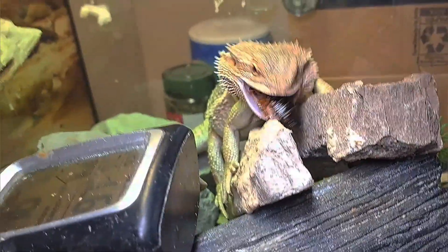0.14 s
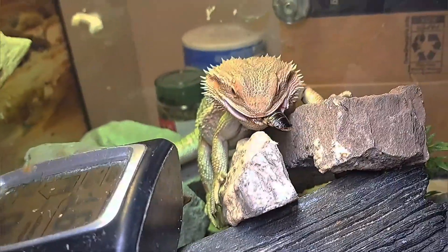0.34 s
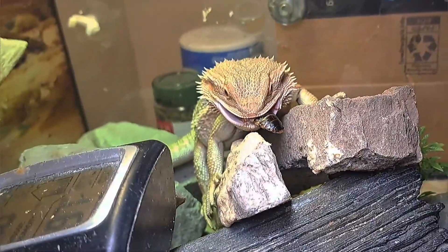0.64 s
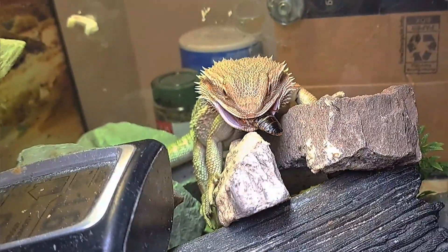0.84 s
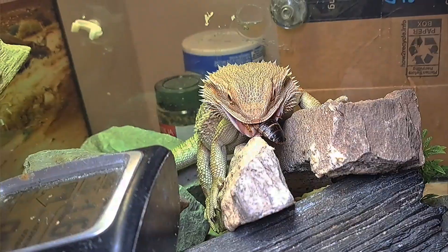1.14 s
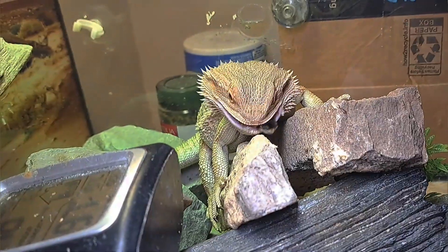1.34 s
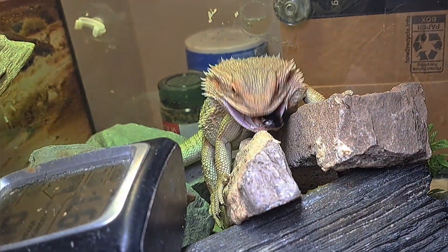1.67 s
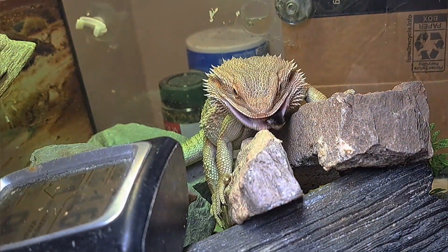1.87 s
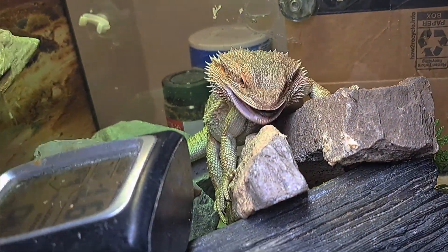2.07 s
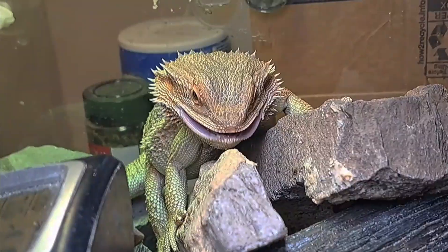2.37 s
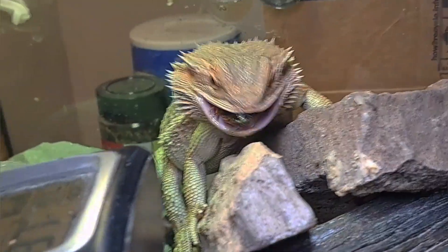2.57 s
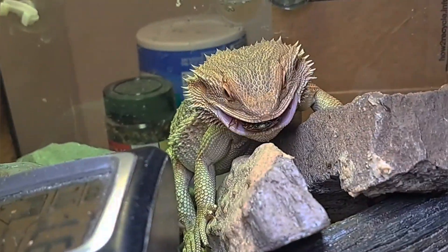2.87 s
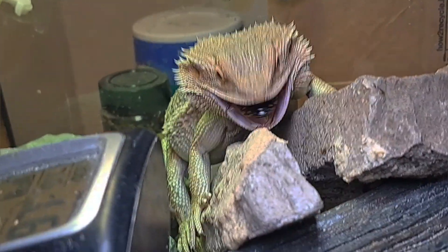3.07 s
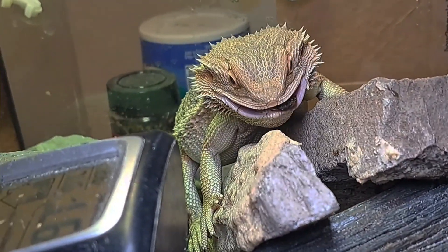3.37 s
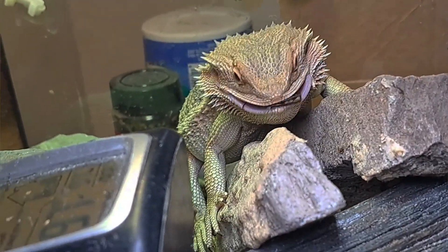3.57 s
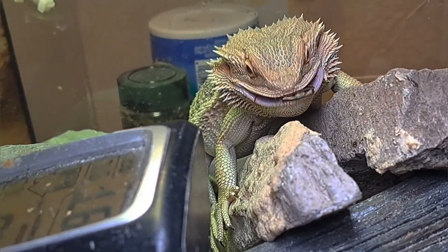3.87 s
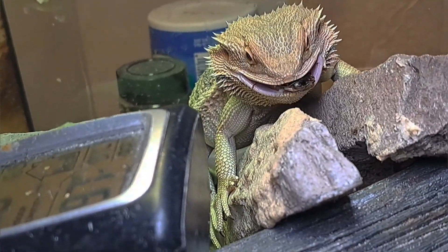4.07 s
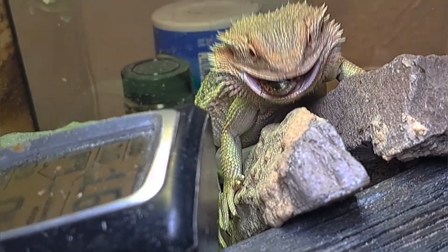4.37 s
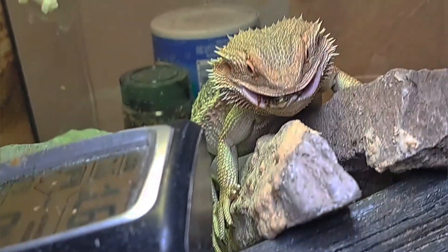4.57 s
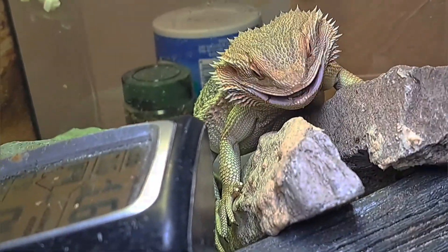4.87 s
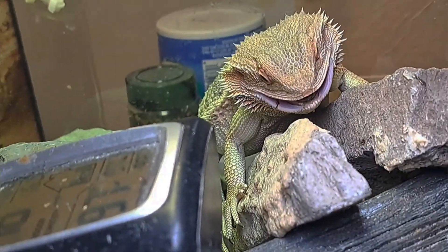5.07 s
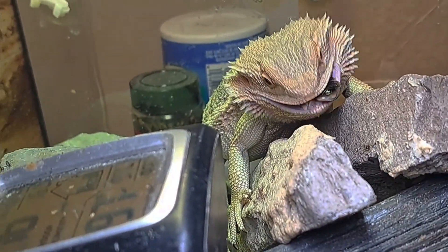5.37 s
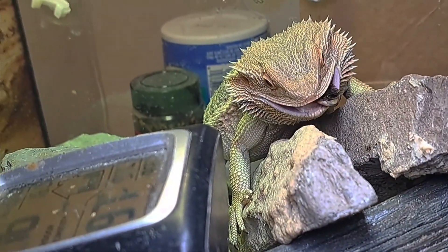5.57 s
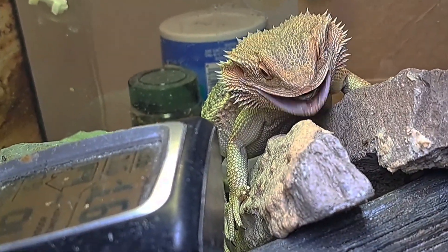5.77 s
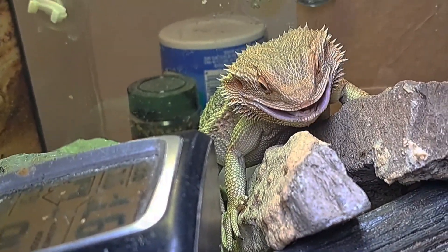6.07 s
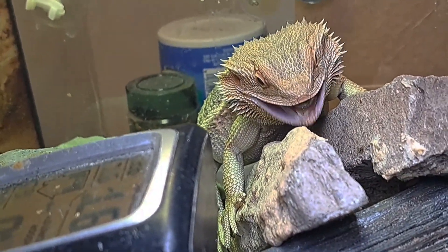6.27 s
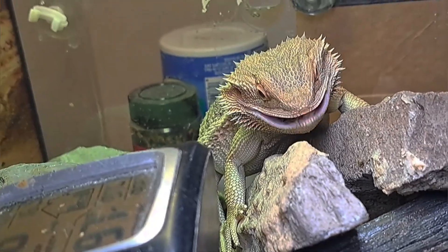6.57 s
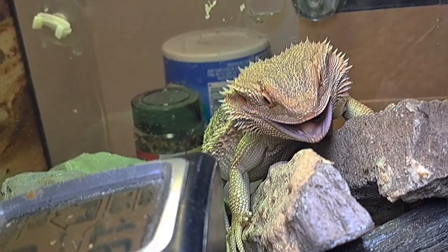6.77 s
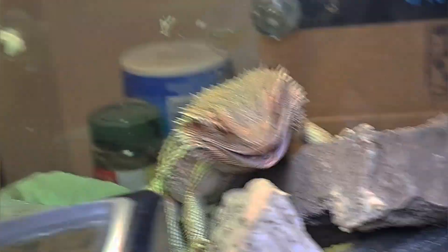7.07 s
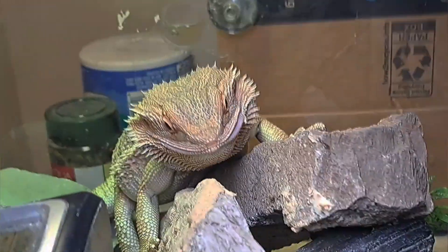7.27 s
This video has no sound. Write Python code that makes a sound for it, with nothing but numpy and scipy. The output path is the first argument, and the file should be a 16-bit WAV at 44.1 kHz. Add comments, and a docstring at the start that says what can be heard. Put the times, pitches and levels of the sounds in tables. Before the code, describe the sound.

A bearded dragon crunches a hard-shelled insect close by, with crisp snaps, crackles and dull bite knocks over a low wavering motor hum.

```python
"""A lizard's crunching meal

A bearded dragon chews a cockroach in a glass tank, close by. Sharp cracks amid random grains make the
shell snap and crackle; damped modes make heavy bites knock dully; gliding tones squeak in the wet mouth.
Decaying random echoes give the tank its short bright ring. A small motor hums nearby at a wandering
speed, as sines over filtered noise, with faint room air and a thin fan whine."""
import sys
import numpy as np
from scipy import signal
from scipy.fft import rfft, irfft
from scipy.io import wavfile
from scipy.ndimage import uniform_filter1d

SR = 44100
rng = np.random.default_rng(int(sys.argv[2]) if len(sys.argv) > 2 else 0)


def generate_wav(signal):
    """Clip the signal to [-1, 1] and save it as 16-bit WAV at the path in sys.argv[1]."""
    frames = np.transpose(np.atleast_2d(signal))
    scaled = np.clip(frames, -1, 1) * 32767
    pcm = np.round(scaled).astype(np.int16)
    wavfile.write(sys.argv[1], SR, pcm)


N = 326781
T = np.arange(N) / SR


def undb(db):
    """Logarithmic level: decibels to amplitude gain."""
    return 10 ** (np.asarray(db) / 20)


def unit(x):
    """Power normalisation: scale to rms 1."""
    return x / np.sqrt(np.mean(x ** 2))


def burst(x, db):
    """Energy normalisation: scale a short sound to the energy of 5 ms at this rms level."""
    return x * undb(db) * np.sqrt(.005 * SR / np.sum(x ** 2))


def curves(rows):
    """Linear interpolation: every column of a table, joined by straight lines in time."""
    s, *columns = np.transpose(rows)
    return [np.interp(T, s, column) for column in columns]


def add(out, s, x, pan_db=0):
    """Superposition: mix a sound into both channels at time s; pan_db is left minus right."""
    i = max(int(s * SR), 0)
    x = x[..., :N - i]
    out[:, i:i + x.shape[-1]] += x * undb(np.array([[pan_db], [-pan_db]]) / 2)


def colour(x, points, size=1024):
    """Minimum-phase filtering: a causal response of given (hz, db) magnitude, by folding the cepstrum."""
    hz, db = np.transpose(points)
    f = np.maximum(np.arange(size // 2 + 1) * SR / size, 1)
    magnitude = undb(np.interp(np.log(f), np.log(hz), db))
    cepstrum = irfft(np.log(magnitude))
    cepstrum[1:size // 2] *= 2
    cepstrum[size // 2 + 1:] = 0
    impulse_response = irfft(np.exp(rfft(cepstrum)))
    return signal.fftconvolve(x, impulse_response)[:len(x)]


def resonance(x, hz, q):
    """Second-order resonance: one band-pass peak."""
    b, a = signal.iirpeak(min(hz, SR / 2.5), max(q, 1), SR)
    return signal.lfilter(b, a, x)


def walk(rate):
    """Slow random modulation: held random values, smoothed, with a spread near 1."""
    k = int(SR / rate)
    held = np.repeat(rng.standard_normal(N // k + 1), k)[:N]
    return uniform_filter1d(held, k)


def grains(size, rate, spread_db):
    """Random point process: sparse impulses, their gain spread_db times a capped exponential draw."""
    keep, strength, sign = rng.random(size), rng.exponential(size=size), rng.standard_normal(size)
    gain = undb(spread_db * np.minimum(strength, 4))
    return (keep < rate / SR) * gain * np.sign(sign)


def tank(x, short_db=0, long_db=-5, short_t60=0.11, long_t60=0.23, lag_s=.00036):
    """Reverberation: glass and stone return two decaying sprays; direct sound lags to the left by up to lag_s."""
    t, out = T[:8192], []
    treble = signal.butter(2, 600, "high", fs=SR, output="sos")
    for lag in (int(lag_s * SR * rng.uniform(.5, 1)), 0):
        short = grains(len(t), rate=7600, spread_db=3.5) * undb(-60 * t / short_t60)
        long = grains(len(t), rate=8900, spread_db=1.0) * undb(-60 * t / long_t60)
        echoes = undb(short_db) * short / np.linalg.norm(short) + undb(long_db) * long / np.linalg.norm(long)
        echoes = signal.sosfilt(treble, echoes * (t > .0004))
        echoes[lag] = 1  # direct sound
        out.append(signal.fftconvolve(x, echoes))
    return np.array(out)


def motor():
    """Periodic rotation: a hum, its octave and weak half-order shaft lines, with casing noise and low rumble."""
    # motor speed: start_s, pitch_hz
    hum_pitch = [(0, 111.3), (0.5, 114), (0.9, 116.5), (1.3, 117.7), (1.42, 114.9), (1.55, 105.3),
                 (1.68, 97.6), (3.15, 97.1), (3.5, 99.6), (3.9, 99.9), (4.4, 102.4), (5.3, 105),
                 (6.2, 107.8), (6.9, 107.9), (7.4, 104.7)]
    # motor loudness: start_s, level_db
    hum_loudness = [(0, -36), (0.47, -28.5), (0.84, -31.5), (1.41, -28), (1.5, -39.5), (1.63, -28.5),
                    (1.74, -40), (2.25, -29), (2.7, -25), (3.62, -28.5), (4.12, -36), (4.38, -25),
                    (4.62, -33.5), (5.45, -42), (5.68, -58), (6.15, -41), (7.15, -40), (7.41, -49.5)]
    # the hum's octave and the rumble: start_s, octave_db, rumble_db
    octave_rumble = [(0, -65.5, -40.5), (1.3, -54.5, -41), (2.1, -59.5, -38.5), (2.7, -53, -37.5),
                     (3.6, -52, -41), (4.5, -55.5, -41), (5.15, -53, -44.5), (5.7, -63.5, -47),
                     (7.1, -57, -44)]
    # spectrum of the low rumble: pitch_hz, level_db
    rumble_colour = [(20, -16), (35, -11.5), (55, 6), (75, 2.5), (110, 1), (165, -6.5), (230, -20.5),
                     (300, -28), (500, -46), (2000, -71)]
    # spectrum of the casing's murmur: pitch_hz, level_db
    casing_colour = [(100, -8.5), (250, -0.5), (320, -4), (410, 2), (500, -12.5), (800, -19.5),
                     (1200, -35.5), (4000, -41.5)]
    (hz,), (hum_db,) = curves(hum_pitch), curves(hum_loudness)
    octave_db, rumble_db = curves(octave_rumble)
    phase = 2 * np.pi * np.cumsum(hz) / SR
    hum = undb(hum_db + 1.2 * walk(16)) * np.sin(phase)
    octave = undb(octave_db + 3.3 * walk(8)) * np.sin(2 * phase)
    shaft = undb(-26.5) * np.sin(phase / 2) + undb(-29.5) * np.sin(1.5 * phase)
    shaft = shaft * undb(hum_db + 3.0 * walk(5.5))
    mid, side = (unit(colour(rng.standard_normal(N), rumble_colour, size=8192)) for _ in range(2))
    casing = unit(colour(rng.standard_normal(N), casing_colour, size=4096))
    casing = undb(0.75 * hum_db - 41.5) * casing  # follows the hum's loudness
    centre = np.sqrt(2) * (hum + octave + shaft) + undb(rumble_db) * mid + casing
    width = undb(rumble_db - 12.0) * side * np.array([[1], [-1]])  # opposite sign in each channel
    return centre * undb(np.array([[.5], [-.5]])) + width


def air():
    """Broadband noise and a pure tone: faint room air with a slightly wavering fan whine that slowly fades."""
    # spectrum of the room air: pitch_hz, level_db
    air_colour = [(100, 9.5), (400, 8), (600, 1.5), (780, 7), (930, -1.5), (1400, -2.5), (3000, -6.5),
                  (6000, -13), (10000, -7), (12500, -4.5), (16000, -9)]
    left, right = (unit(colour(rng.standard_normal(N), air_colour, size=4096)) for _ in range(2))
    whine_phase = 2 * np.pi * np.cumsum(840 + 3 * walk(25)) / SR
    whine = undb(-72 - 2 * T + 2 * walk(20)) * np.sin(whine_phase)  # fades 2 dB per second
    return undb(-69 + .7 * walk(27)) * np.array([left, right]) + whine


def opening_ring():
    """Free damped oscillation: a low ring dies away exponentially from the start."""
    out = np.zeros((2, N))
    ring = undb(-32.0 - 60 * T / 0.46) * np.sin(2 * np.pi * 419 * T)
    add(out, 0, ring, pan_db=-6.0)
    return out


def wet_rubs():
    """Frictional noise: wet surfaces rub in the mouth as dense random grains that decay."""
    # rubs: start_s, level_db (before the decay), decay_s
    rub_table = [(0, -53.5, 0.039), (6.437, -67, 0.081), (6.52, -68.5, 0.036), (7.075, -57, 0.012),
                 (7.121, -67.5, 0.15)]
    # spectrum of the rubbing: pitch_hz, level_db
    rub_colour = [(300, -39), (650, 10), (1000, 9.5), (1500, 4.5), (2400, 2), (4000, -4), (6000, -3),
                  (9000, -3.5), (16000, -11)]
    out, t = np.zeros((2, N)), T[:12288]
    for s, db, decay in rub_table:
        rub = unit(colour(grains(len(t), rate=1800, spread_db=-7.5), rub_colour))
        add(out, s, tank(undb(db) * rub * np.exp(-t / decay)))
    return out


def crumble():
    """Fracture noise under load: jaw pressure scales grit and larger fragments; faint ticks go on between."""
    # jaw presses: start_s, swell_s, level_db
    chew_table = [(0.13, 0.11, -55), (0.35, 0.033, -56.5), (1.22, 0.079, -49), (1.37, 0.098, -58),
                  (1.758, 0.022, -58.5), (2.02, 0.088, -55), (2.25, 0.068, -52.5), (2.38, 0.21, -56),
                  (2.58, .2, -49.5), (2.84, 0.14, -57), (3.05, 0.16, -53.5), (3.24, 0.084, -52.5),
                  (3.47, 0.12, -55.5), (3.78, 0.12, -58.5), (4.33, 0.11, -51), (4.78, 0.049, -63),
                  (4.9, 0.11, -62.5), (5.33, 0.051, -63), (6.41, 0.08, -53.5), (7.07, 0.059, -65),
                  (7.18, 0.086, -61)]
    # spectrum of crumbling shell: pitch_hz, level_db
    crumble_colour = [(400, -19), (1500, -11), (3500, -14), (6000, -6.5), (8000, -1.5), (10000, -3.5),
                      (12500, 0), (15500, -0.5)]
    release_s, grit_db, fragment_db, tick_db = 0.064, -2, -6, -88
    pressure = np.zeros(N)
    for s, swell, db in chew_table:
        rise = np.clip((T - s) / swell, 0, 1)
        letting_go = np.exp(-np.maximum(T - s - swell, 0) / release_s)
        pressure += undb(db) * rise * letting_go
    pressure = pressure * undb(2.8 * walk(45))

    def debris(rate, spread_db):
        """Filtered point process: shell grains at rms 1."""
        return unit(colour(grains(N, rate, spread_db), crumble_colour))

    grit = np.array([debris(rate=5800, spread_db=-0.9) for _ in range(2)])
    fragments = undb(fragment_db) * pressure * debris(rate=55, spread_db=4.5)
    ticks = undb(tick_db) * debris(rate=4, spread_db=-3.0)
    echoed = tank(fragments + ticks, short_db=4.5, short_t60=0.085)[:, :N]
    return undb(grit_db) * pressure * grit + echoed


def snaps():
    """Impulse excitation: each snap is a sharp crack amid a brief spray of grains, coloured by a random resonance."""
    # loud shell snaps: start_s, hollow_body_db, plate_ring_db, bright_splinter_db, left_minus_right_db
    snap_table = [(0.157, -63, -54.5, -59, -1), (0.187, -69, -54, -51, 0), (0.21, -76, -57.5, -50, 1),
                  (0.255, -69.5, -52.5, -54, -5), (0.311, -75.5, -59, -58, -2), (0.36, -90, -75, -55, 1),
                  (0.443, -79.5, -57.5, -55, -7), (0.891, -80.5, -67.5, -66, -2),
                  (0.982, -84, -74.5, -65.5, 1), (1.105, -84.5, -68, -65.5, -7),
                  (1.323, -65, -53.5, -60, -6), (1.406, -58.5, -48.5, -47, -2),
                  (1.418, -57.5, -51, -40, -1), (1.54, -86, -65, -57, 0.5), (1.79, -55.5, -42, -39.5, -2),
                  (1.807, -66, -56, -60, -5), (2.041, -84, -51, -48, -3), (2.095, -63, -46.5, -39, -2),
                  (2.151, -73, -49, -42.5, -3), (2.302, -49, -46, -33, 0), (2.455, -57, -47.5, -49, -6),
                  (2.659, -58, -50.5, -39, 1), (2.72, -55.5, -52, -41, 0), (2.778, -44.5, -47.5, -50, -7),
                  (3.12, -64, -49.5, -40.5, 1), (3.249, -60, -53.5, -52, 0), (3.267, -60.5, -54, -48, -1),
                  (3.328, -47, -45.5, -34.5, 0.5), (3.489, -80, -68, -60, -2.5),
                  (3.58, -62.5, -57, -71, -5), (3.622, -70.5, -76.5, -51.5, 2), (3.88, -59, -54, -44, 4),
                  (3.894, -54, -46, -35.5, -2), (3.936, -66, -59.5, -50, -1),
                  (4.32, -69.5, -66.5, -59.5, -1), (4.427, -61, -51, -42.5, 1), (4.472, -64, -57, -56, -6),
                  (4.485, -52.5, -56, -38.5, 2), (4.498, -56, -47.5, -40.5, -1),
                  (4.695, -90, -62.5, -46, 3), (4.809, -65.5, -51.5, -51.5, -2),
                  (4.864, -82, -58.5, -71, -4), (4.994, -65.5, -60.5, -45, 2),
                  (5.196, -60.5, -41, -51, -0.5), (5.306, -70, -49.5, -48, 0), (5.418, -65, -58.5, -54, 1),
                  (5.441, -64, -57, -57, 0), (5.46, -52, -44, -41.5, -1), (5.633, -69.5, -59.5, -73, -6),
                  (5.678, -79, -67.5, -78, -8), (6.333, -77, -67, -68, -4), (6.381, -81, -59.5, -70, -4),
                  (6.445, -60.5, -53, -46.5, 0), (6.484, -64.5, -60, -53, -10), (6.492, -61, -55, -34.5, 3),
                  (6.523, -63.5, -56, -50, -4), (6.601, -80, -67, -55.5, 2), (7.199, -66, -52, -55, -2),
                  (7.264, -47, -39, -33.5, -1)]
    # spectra of hollow body, plate ring and bright splinter: pitch_hz, level_db
    body_colour = [(200, -14), (600, 2), (1200, -10.5), (2000, -5.5), (4500, 4), (6000, -4), (10000, -28.5)]
    plate_colour = [(1000, -46.5), (4000, -23.5), (5300, -9.5), (8000, 3.5), (10000, -2), (12000, -17.5),
                    (16000, -23)]
    splinter_colour = [(3000, -47.5), (9000, -25), (11300, 2.5), (14500, 6), (16000, -2)]
    out, t = np.zeros((2, N)), T[:2048] - T[512]  # the sharp crack is at t = 0
    # weak grains on both sides of the crack, stronger ones just after it
    around = 0.045 * np.exp(-abs(t) / 0.0097)
    after = .45 * np.exp(-abs(t) / .0011) * (t > 0)
    for s, body_db, plate_db, splinter_db, pan_db in snap_table:
        crack = grains(len(t), rate=4000, spread_db=3.5) * (around + after) + (t == 0)
        ringing = crack + .5 * resonance(crack, rng.uniform(7000, 14000), q=6)
        body = burst(colour(crack, body_colour), body_db)
        plate = burst(colour(ringing, plate_colour), plate_db)
        splinter = burst(colour(ringing, splinter_colour), splinter_db)
        echoed = tank(body + plate + splinter, short_db=2.0, long_db=-4.0, short_t60=0.054, long_t60=.17)
        add(out, s + t[0], echoed, pan_db)
    return out


def bites():
    """Modal impact: the closing jaw excites damped modes while the insect's body collapses in a dense crush."""
    # heavy bites: start_s, knock_db, crush_db, mouth_resonance_hz
    bite_table = [(0.38, -34, -42, 1990), (1.281, -40, -48, 1000), (1.325, -40, -69, 1300),
                  (1.692, -39.5, -54.5, 1950), (1.806, -43, -57.5, 1550), (2.039, -44.5, -62.5, 2400),
                  (2.293, -43, -49, 1500), (2.451, -47, -65, 1994), (2.527, -42.5, -64, 1600),
                  (2.650, -45, -56.5, 2050), (2.709, -45.5, -54, 2010), (2.780, -30, -36.5, 2040),
                  (3.097, -43.5, -64, 2000), (3.17, -33, -45, 2110), (3.323, -45, -71, 2280),
                  (3.575, -47, -56.5, 2000), (3.878, -49.5, -54.5, 2000), (4.475, -45, -67, 2000),
                  (4.989, -48, -70, 2000), (5.417, -62, -60.5, 2020), (6.500, -58, -69, 2000),
                  (7.264, -36.5, -55.5, 908)]
    # modes of the knock (before a small random detuning): pitch_hz, level_db, t60_s
    knock_modes = [(325.4, -3, 0.096), (380.3, -0.5, 0.13), (399.6, -1.5, 0.29), (554, -16, 0.3),
                   (828, -15.5, 0.32)]
    # spectrum of the crush: pitch_hz, level_db
    crush_colour = [(250, 1.5), (600, 1.5), (950, -2), (1250, -7), (1550, -6), (2050, -7), (2600, -12.5),
                    (3500, -14.5), (5000, -12.5), (9000, -14.5), (16000, -23)]
    out, t = np.zeros((2, N)), T[:12288]
    for s, knock_db, crush_db, mouth_hz in bite_table:
        ring = np.zeros(len(t))
        for hz, db, t60 in knock_modes:
            mode_hz = hz * (1 + 0.016 * rng.standard_normal())
            ring += undb(db - 60 * t / t60) * np.sin(2 * np.pi * mode_hz * t)
        knock = burst(ring * (1 - np.exp(-t / 0.0016)), knock_db)
        # the low ring reaches the left side a little later
        add(out, s, np.array([np.interp(t - .0004, t, knock), knock]), pan_db=-3.5)
        collapse = (1 - np.exp(-t / 0.0013)) * np.exp(-t / 0.022)
        crush = grains(len(t), rate=3000, spread_db=-1.5) * collapse
        crush = crush + undb(4.5) * resonance(crush, mouth_hz, q=2.5)
        crush = burst(colour(crush, crush_colour), crush_db)
        add(out, s, tank(crush, short_db=4), pan_db=-2)
    return out


def squeaks():
    """Frequency modulation: thin gliding tones, roughened by random flutter, swell quickly and fade."""
    # squeaks: start_s, length_s, start_hz, middle_hz, end_hz, level_db, overtones_db
    squeak_table = [(1.865, 0.25, 2080, 2120, 2070, -73.5, -20), (6.43, 0.11, 806, 847, 780, -61, -20),
                    (6.485, 0.12, 1180, 1286, 1380, -57.5, -20), (6.535, 0.067, 755, 670, 615, -59.5, -20),
                    (6.592, 0.157, 864, 876, 935, -55.5, -18), (7.09, .1, 1026, 915, 1000, -36, 1)]
    # overtones: multiple, level_db (added to overtones_db)
    overtone_table = [(2, -36), (3, -31), (6, -21.5)]
    peak_share, fade_db, roughness = .2, 17, .024
    out = np.zeros((2, N))
    for s, length, start_hz, middle_hz, end_hz, db, bright_db in squeak_table:
        u = np.linspace(0, 1, int(length * SR))
        hz = np.polyval(np.polyfit([0, .5, 1], [start_hz, middle_hz, end_hz], 2), u)
        flutter = roughness * (walk(1100) + .6 * walk(250))[:len(u)]
        phase = 2 * np.pi * np.cumsum(hz * (1 + flutter)) / SR
        tone = np.sin(phase)
        for multiple, overtone_db in overtone_table:
            tone = tone + undb(bright_db + overtone_db) * np.sin(multiple * phase)
        swell = np.minimum(u / peak_share, 1) * undb(-fade_db * np.maximum(u - peak_share, 0))
        swell = swell * signal.windows.tukey(len(u), .15)
        squeak = undb(db + 2 * walk(140)[:len(u)]) * swell * tone
        add(out, s, tank(squeak, short_db=-8, long_db=-7, long_t60=.25, lag_s=0))
    return out


def squelch():
    """Cavity filtering: one soft wet squelch of tiny bursting bubbles, heard through the half-open mouth."""
    # spectrum passed by the mouth: pitch_hz, level_db
    squelch_colour = [(500, -30), (850, -8), (1080, 0), (1450, -7), (1850, -26), (2100, -14), (2300, -36)]
    out, t = np.zeros((2, N)), T[:8192]
    swell = t ** 2 * np.exp(-t / .011)
    bubbles = colour(grains(len(t), rate=1100, spread_db=0.5) * swell, squelch_colour)
    add(out, 1.866, tank(burst(bubbles, -49), short_db=-4, short_t60=.04, lag_s=0))
    return out


def dry_pops():
    """Impulse response: two small dry pops, each a single filtered impulse without echoes."""
    # pops: start_s, level_db
    pop_table = [(2.3285, -30.5), (2.35, -41.5)]
    # spectrum of a pop: pitch_hz, level_db
    pop_colour = [(200, 6.5), (800, -2), (3000, -15.5), (16000, -30)]
    out, t = np.zeros((2, N)), T[:4096]
    for s, db in pop_table:
        add(out, s, burst(colour(1. * (t == 0), pop_colour), db))
    return out


def hard_tap():
    """Impact excitation: something hard is tapped once near the end, an impulse with a brief rattle."""
    # spectrum of the tap: pitch_hz, level_db
    tap_colour = [(100, 1), (400, -3), (800, 1), (1200, -5.5), (2500, -9.5), (4000, -21.5), (7000, -21.5),
                  (16000, -31)]
    out, t = np.zeros((2, N)), T[:4096]
    rattle = 0.11 * grains(len(t), rate=3100, spread_db=4.0) * np.exp(-t / 0.0052)
    tap = colour(rattle + (t == 0), tap_colour)
    add(out, 7.377, tank(burst(tap, -33.5)))
    return out


def scene():
    """Linear superposition: motor and air around the sounds of mouth, shell and impacts."""
    around = motor() + air()
    mouth = wet_rubs() + crumble() + snaps() + bites() + squeaks() + squelch()
    return around + mouth + opening_ring() + dry_pops() + hard_tap()


def record(dry):
    """Gain modulation and low-pass filtering: the level dips briefly once; the top is cut."""
    dip_s, dip_length_s, dip_db, top_hz = 2.328, .013, -22, 15750
    dip = uniform_filter1d(1. * ((T > dip_s) & (T < dip_s + dip_length_s)), size=128)
    low_pass = signal.ellip(8, .2, 70, top_hz, fs=SR, output="sos")
    return signal.sosfilt(low_pass, dry * undb(dip_db * dip))


dry = scene()
out = record(dry)
generate_wav(out)
```